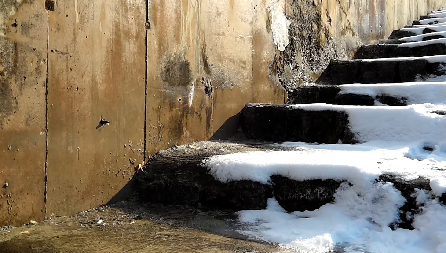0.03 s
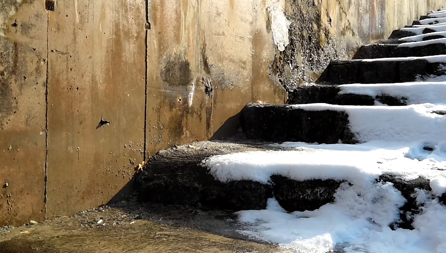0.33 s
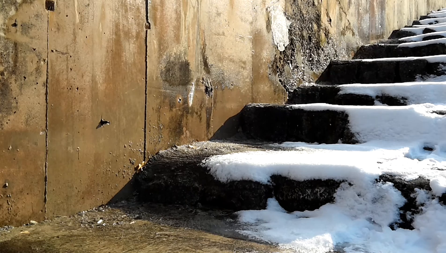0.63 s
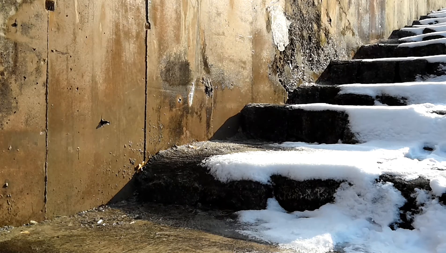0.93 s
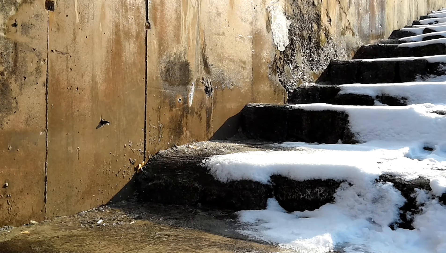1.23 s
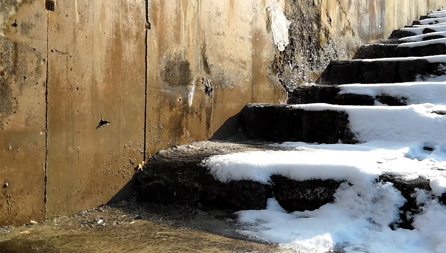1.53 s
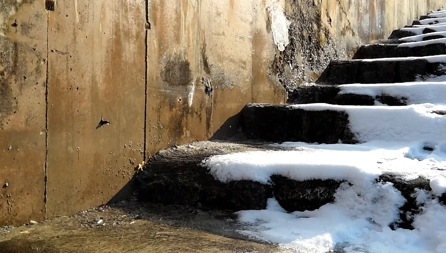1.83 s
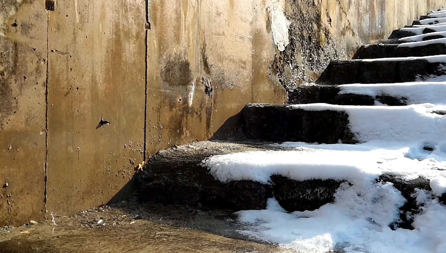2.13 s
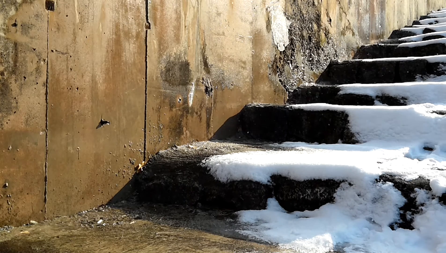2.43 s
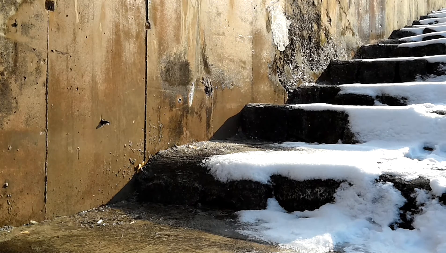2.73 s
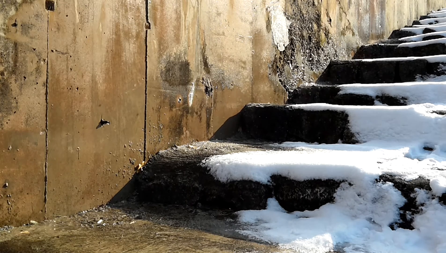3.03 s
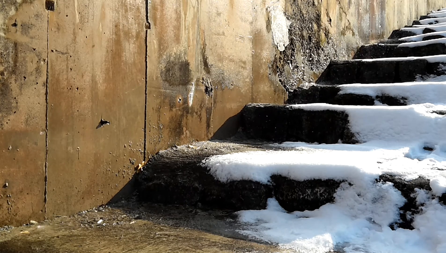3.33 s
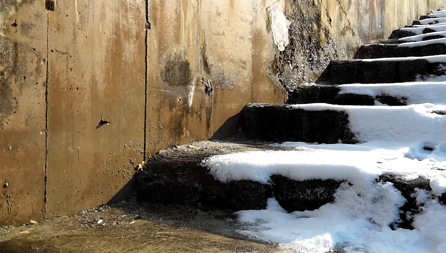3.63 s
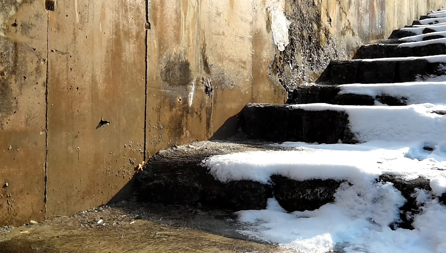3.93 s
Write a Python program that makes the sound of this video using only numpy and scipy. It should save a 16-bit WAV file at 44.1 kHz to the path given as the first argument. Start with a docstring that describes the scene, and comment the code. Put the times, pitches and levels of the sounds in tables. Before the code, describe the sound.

Close drops of water tick and spit on outdoor stone steps, with smaller droplets pattering all around. Faint at first, the dripping grows louder and busier as a low wind rumble builds and thumps against the microphone.

```python
"""Sharp ticks of dripping water, over a fine patter and a soft wash of outdoor air.
Meltwater is falling onto stone steps beside a concrete wall. Each near drop lands with a crack,
a short spray and an echo off the stone; smaller ones patter all round and merge into a far hiss.
A rising wind rumbles on the microphones and ends in a few hard buffets."""
import sys
import numpy as np
from scipy import signal
from scipy.fft import rfft, irfft
from scipy.io import wavfile
from scipy.ndimage import uniform_filter1d

SR = 44100
rng = np.random.default_rng(int(sys.argv[2]) if len(sys.argv) > 2 else 0)


def wrap_up_sound(samples):
    """Save the sound to the file named by the first command line argument, as 16-bit audio."""
    columns = np.atleast_2d(samples).T
    # keep every value between -1 and 1, then stretch to whole-number steps
    tamed = np.clip(columns, -1, 1)
    steps = np.round(tamed * 32767).astype(np.int16)
    wavfile.write(sys.argv[1], SR, steps)


N = 176400


def from_db(db):
    """Turn decibels into a number to multiply by (a gain)."""
    return 10 ** (np.asarray(db) / 20)


def rms_one(x):
    """Scale each channel to an average strength (rms) of 1."""
    return x / np.sqrt(np.mean(x ** 2, axis=-1, keepdims=True) + 1e-20)


def pan(db):
    """Left and right gains; positive db leans left."""
    gains = from_db([[db / 2], [-db / 2]])
    return gains / np.sqrt(np.mean(gains ** 2))


def band(x, low_hz, high_hz):
    """Keep the frequencies between two limits."""
    edges = np.clip([low_hz, high_hz], 10, .45 * SR)
    return signal.sosfilt(signal.butter(2, edges, "band", fs=SR, output="sos"), x)


def noise(spectrum):
    """Separate noise for each ear, shaped by (f/Hz, level/dB) points."""
    hz, db = np.transpose(spectrum)
    f = np.maximum(np.arange(N // 2 + 1) * SR / N, 1)
    octaves_outside = np.maximum(np.log2(hz[0] / f), 0) + np.maximum(np.log2(f / hz[-1]), 0)
    gain = from_db(np.interp(np.log(f), np.log(hz), db) - 18 * octaves_outside)
    return rms_one(irfft(rfft(rng.standard_normal((2, N))) * gain, N))


def add(out, s, sound):
    """Mix a stereo sound in at s seconds."""
    i = int(np.clip(s * SR, 0, N - 1))
    out[:, i:i + sound.shape[1]] += sound[:, :N - i]


def delayed(x, s):
    """The same sound, s seconds later."""
    return np.concatenate([np.zeros(round(s * SR)), x])[:len(x)]


def fading(energy, decay_s):
    """Spread energy into a tail whose amplitude falls to about a third in decay_s."""
    rate = 2 / (decay_s * SR)
    return signal.lfilter([rate], [1, -np.exp(-rate)], energy + 1e-18)


def at_hz(spectrum, hz):
    """Read levels in dB between a spectrum's points."""
    f, db = np.transpose(spectrum)
    return np.interp(np.log(hz + 1), np.log(f), db)


def coloured(x, gain):
    """Give each frequency its own gain, then cut the bass."""
    size = x.shape[-1]
    cepstrum = irfft(np.log(gain), size)
    cepstrum[1:size // 2] *= 2   # fold the filter forward in time, so nothing sounds early
    cepstrum[size // 2 + 1:] = 0
    shaped = irfft(rfft(x) * np.exp(rfft(cepstrum)), size)
    return band(shaped, 800, SR)


# How the background swells and lulls: t/s, wind level/dB, air level/dB, patter level/dB
SWELL = [(0.0, -55, -66.5, -57.5), (0.1, -58, -65.5, -62), (0.16, -52, -69, -67),
         (0.22, -44.5, -62.5, -55.5), (0.31, -45, -57.5, -57.5), (0.38, -53.5, -68.5, -62),
         (0.44, -43.5, -61, -60.5), (0.58, -61.5, -70, -68), (0.7, -56, -70, -62),
         (0.76, -45.5, -58, -58.5), (0.9, -51.5, -65.5, -64), (1.0, -50.5, -59.5, -60),
         (1.15, -57, -66.5, -65), (1.28, -44.5, -59, -57.5), (1.46, -49, -64, -63.5),
         (1.559, -41.5, -56.5, -49), (1.78, -33.5, -53.5, -52.5), (1.98, -39.5, -56, -53),
         (2.14, -49.5, -60, -58), (2.36, -43, -59.5, -54), (2.5, -35.5, -54.5, -51.5),
         (2.62, -26.5, -47, -45.5), (2.77, -21.5, -47, -45.5), (2.92, -25, -47.5, -42.5),
         (3.02, -34.5, -51.5, -51.5), (3.13, -23, -49, -47), (3.19, -27.5, -47, -50.5),
         (3.31, -18.5, -46.5, -41), (3.42, -30.5, -49.5, -49.5), (3.54, -25.5, -49, -45),
         (3.63, -21.5, -48.5, -46), (3.85, -18.5, -45.5, -43), (4.0, -24, -49.5, -41)]
def swell_gains():
    """Slowly changing gains for wind, air and patter."""
    times, *levels = np.transpose(SWELL)
    return [from_db(np.interp(np.arange(N) / SR, times, db)) for db in levels]


# Tone colour of the outdoor air: f/Hz, level/dB
AIR_SPECTRUM = [(100, 10), (250, -2), (380, -0.5), (480, -2.5), (620, 0.5), (850, -6), (1200, -14.5),
                (2000, -18), (4000, -17.5)]
def air(likeness=0.4, note_hz=614.5, width_hz=16.7):
    """A soft wash, partly alike in both ears, with one faint note in it."""
    note = rms_one(band(rng.standard_normal(N), note_hz - width_hz / 2, note_hz + width_hz / 2))
    shared = np.sqrt(likeness) * noise(AIR_SPECTRUM)[0]
    separate = np.sqrt(1 - likeness) * noise(AIR_SPECTRUM)
    return pan(2) * (from_db(5.5) * (shared + separate) + from_db(-12.5) * note)


# Tone colour of the wind's rumble: f/Hz, level/dB
WIND_SPECTRUM = [(20, 9), (35, 0.5), (60, -2), (100, -12.5), (160, -19.5), (250, -33.5), (400, -55.5),
                 (800, -44)]
def wind():
    """Moving air rumbles on both microphones."""
    rumble = noise(WIND_SPECTRUM)
    rumble /= np.sqrt(uniform_filter1d(rumble ** 2, size=5000, axis=1))   # even out the loudness
    return from_db(3) * pan(3.5) * rumble


# Tone colour of a buffet, a low thump of wind: f/Hz, level/dB
BUFFET_SPECTRUM = [(30, -2), (70, 6.5), (130, -5.5), (250, -14.5), (400, -27.5), (700, -47.5), (1500, -52)]
# The buffets: t/s, level/dB, half length/s
BUFFETS = [(2.764, -10.5, 0.0073), (2.776, -27, 0.007), (3.588, -9.5, 0.0056), (3.645, -9.5, 0.019),
           (3.747, -7.5, 0.012), (3.916, -13.5, 0.0074), (3.966, -4, 0.0012), (3.992, -6.5, 0.013)]
def buffets():
    """Short swirls of air hit the left microphone."""
    out, t = np.zeros((2, N)), np.arange(N) / SR
    swirl = noise(BUFFET_SPECTRUM)[0]
    for s, db, half_s in BUFFETS:
        puff = swirl * np.exp(-.5 * ((t - s) / half_s) ** 2)
        strength = np.sqrt(np.sum(puff ** 2) / (2 * half_s * SR))
        out[0] += from_db(db) * puff / strength
    return out


# Tone colour of the far patter, and of the echo off the stone: f/Hz, level/dB
HISS_SPECTRUM = [(1000, 2.5), (2000, -6), (3300, 2.5), (4800, 1), (6500, 6), (8800, 8), (12000, 5.5),
                 (15500, 8.5)]
def far_patter():
    """Many distant drops merge into a hiss."""
    return from_db(-1) * noise(HISS_SPECTRUM)


def stone_echo(x, fade_60_db_s=0.12):
    """Sound bounces between wall and steps, leaving a faint, quickly dying rustle."""
    energy = fading(np.mean(x ** 2, axis=0), decay_s=fade_60_db_s / np.log(1000))
    return from_db(-11.5) * np.sqrt(energy) * noise(HISS_SPECTRUM)


SPRAY_DECAY_S = 0.005
# Tone colour of a droplet: f/Hz, level/dB
DROPLET_SPECTRUM = [(1500, -11.5), (3300, -13), (4800, -4), (6500, -3), (8800, 0), (11500, -4),
                    (15500, -3.5)]
def droplets(rows, right_lag_s=0.00043):
    """Each droplet lands as one sharp click with a tiny splat and spray."""
    clicks = np.zeros((2, N))
    tilts = 0.27 * rng.standard_normal(len(rows))   # a second sample dulls or brightens each click
    for (s, db, pan_db), tilt in zip(rows, tilts):
        if s < N / SR:
            add(clicks, s, from_db(db) * pan(pan_db) * [1, tilt])
    splat_energy = from_db(1.5) ** 2 * fading(clicks ** 2, decay_s=0.0011)
    spray_energy = from_db(-6) ** 2 * fading(clicks ** 2, SPRAY_DECAY_S)
    tails = np.sqrt(splat_energy + spray_energy) * rng.standard_normal((2, N))
    f = np.arange(N // 2 + 1) * SR / N
    colour = rms_one(from_db(at_hz(DROPLET_SPECTRUM, f)))
    left, right = coloured(clicks + tails, colour)
    return np.array([left, delayed(right, right_lag_s)])


def fine_patter(per_s=170, pan_spread_db=8.5, count=1500):
    """Fine droplets fall at random, each with its own size and place."""
    gaps, sizes = rng.exponential(size=(2, count))
    times = np.cumsum(gaps) / per_s
    levels_db = 16.5 + np.minimum(6.5 * sizes, 17)
    pans_db = pan_spread_db * rng.standard_normal(count)
    return droplets(np.transpose([times, levels_db, pans_db]))


# Droplets that stand out from the patter: t/s, level/dB, left minus right/dB
CLEAR_DROPLETS = [(0.1052, -28, 2), (0.2977, -31, -1), (0.8051, -33, 3), (0.8435, -34.5, -4),
                  (0.9058, -35, 1), (1.0645, -31.5, 4.5), (1.1498, -34.5, 2), (1.259, -28.5, -3),
                  (1.3414, -32.5, 1), (1.4177, -33, -5), (1.6636, -25.5, -5), (1.699, -23, -2),
                  (1.9864, -19, 0), (2.0657, -20, 0), (2.0887, -20, -2.5), (2.5052, -24, 3.0),
                  (2.7384, -15.5, 6), (2.799, -16.5, -2), (2.8848, -18, 11), (2.8914, -22, 2.0),
                  (2.9004, -18, 5), (2.9163, -12, -5), (2.9264, -25, 0.5), (3.039, -26, -7),
                  (3.0779, -20.5, -8), (3.2784, -13, -4), (3.5872, -24, -10), (3.7638, -19, -8),
                  (3.9689, -21, -8), (3.9833, -14.5, -2)]
def clear_droplets():
    """Single droplets land as dry spits with no ring."""
    return from_db(5.5) * droplets(CLEAR_DROPLETS)


# Tone colour of the bare crack of water on stone: f/Hz, level/dB
CRACK_SPECTRUM = [(1000, -14.5), (3000, -22.5), (4500, -5), (15000, -2)]
def drop(low_hz, low_db, high_hz, high_db, fizz_db, lag_s, size=2048):
    """A click scatters into a splat and a spray, coloured by two broad rings and a high fizz."""
    t, f = np.arange(size) / SR, np.arange(size // 2 + 1) * SR / size
    splat, share = 1, 0.49   # a splat is a run of ticks, each passing this share on to the next
    for gap_s in 0.0003 * rng.uniform(0.54, 2, 2):
        delay = np.exp(-2j * np.pi * f * round(gap_s * SR) / SR)
        splat = splat * (delay - share) / (1 - share * delay)
    hit = np.array([delayed(irfft(splat), max(s, 0)) for s in (-lag_s, lag_s)])
    spray = from_db(-4.5) * rms_one(rng.standard_normal((2, size)) * np.exp(-t / SPRAY_DECAY_S))
    fizz_ramp = np.interp(f, (9700, 14400), [0, 1])
    power = from_db(at_hz(CRACK_SPECTRUM, f) + fizz_db * fizz_ramp) ** 2
    for hz, db, half_width_hz in ((low_hz, low_db, 820), (high_hz, high_db, 1480)):
        ring = from_db(db) / (1 + ((f - hz) / half_width_hz) ** 2)
        power += ring ** 2
    tick = coloured(rms_one(hit) + spray, np.sqrt(power))
    return rms_one(tick) * np.sqrt(0.0035 / t[-1])   # as much energy as 3.5 ms at strength 1


# Near drops: t/s, level/dB, low ring f/Hz, its level/dB, high ring f/Hz, its level/dB, fizz level/dB,
# left minus right/dB, right ear's lag/s. Ring and fizz levels are relative to the crack.
NEAR_DROPS = [(0.2506, -25, 5260.0, 11, 9360, 13.5, 12.0, -0.5, 0.00027),
              (0.3136, -30.9, 5260.0, -12.0, 9350, 18, 9.0, 2.0, 0.00041),
              (0.41, -27, 1240.0, -10.0, 6860, 4.5, -5, -4, 0.00011),
              (0.487, -27.5, 4130, 6.0, 7370.0, 9.5, 1, -3, 0.00018),
              (0.7336, -40.5, 3750, 15.5, 6880.0, 8, 3.0, -2, 9e-05),
              (0.9941, -30.5, 4800, 8, 6320.0, 9.0, 3, 0, 0.00045),
              (1.363, -34, 5260.0, -12.0, 7800, 18, 17.5, -4, -0.00023),
              (1.778, -29.5, 3700, 1.5, 8280.0, 2, -0.5, -4, 0.00011),
              (2.019, -27.5, 5430, 20, 8570.0, 23.5, 5, 3, 0.00043),
              (2.213, -32.5, 5230, 22.0, 9050, 12, 8, 0.5, 0.00039),
              (2.2618, -35, 5260.0, -12.0, 7940.0, 22, 12, -3.0, 0.00052),
              (2.7341, -17.5, 5260.0, -7, 9300, 6.5, 9.5, 1, 0.00043),
              (3.1113, -22, 1900.0, -3, 8100, 11, 1, -5.0, 0.00018),
              (3.1153, -24, 2680, 10, 8030.0, 2.5, 2.5, 2, 0.00027),
              (3.3412, -27.0, 4810.0, -1, 7830.0, -3, -4, 0.5, 0.00041),
              (3.408, -21.5, 2440, 1.5, 7750, 6, -11, -3.5, 9e-05),
              (3.4467, -13, 3750, 14.5, 7250, 12, 3, -2, 0.00045),
              (3.66, -30, 5600.0, -12.0, 8010.0, 8.0, -8, -10, -0.00011),
              (3.6884, -25.5, 5600.0, -12.0, 8500, 13, 4, 3, 0.00043),
              (3.8398, -19, 5030, 15.0, 8830, 15.0, 8.5, 3.0, 0.00039)]
def near_drops():
    """Meltwater strikes the steps close by, each drop with its own tick."""
    out = np.zeros((2, N))
    for s, db, *colour, pan_db, lag_s in NEAR_DROPS:
        add(out, s, from_db(db + 0.6) * pan(pan_db) * drop(*colour, lag_s))
    return out


def scene():
    """Drops and their echo, over far patter, air and wind."""
    wind_gain, air_gain, patter_gain = swell_gains()
    drops = near_drops() + clear_droplets() + patter_gain * fine_patter()
    hiss = patter_gain * far_patter()
    return drops + stone_echo(drops) + hiss + air_gain * air() + wind_gain * wind() + buffets()


def record(dry, cutoff_hz=16000):
    """Clip peaks at full scale, then cut the highest treble."""
    low_pass = signal.ellip(10, .1, 80, cutoff_hz, fs=SR, output="sos")
    return signal.sosfilt(low_pass, np.clip(dry, -1, 1))


dry = scene()
out = record(dry)
wrap_up_sound(out)
```